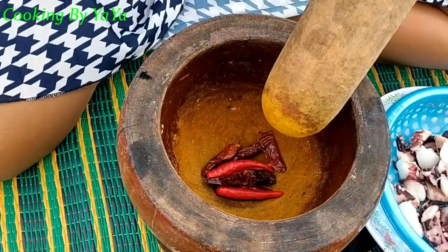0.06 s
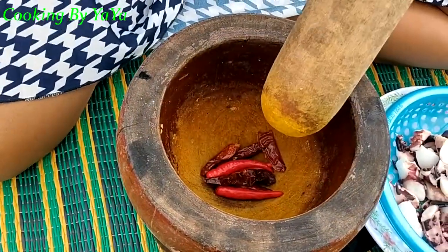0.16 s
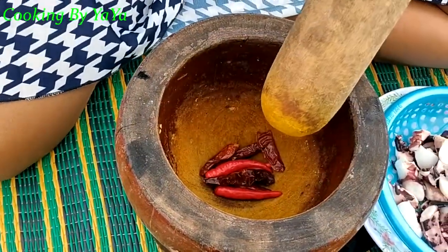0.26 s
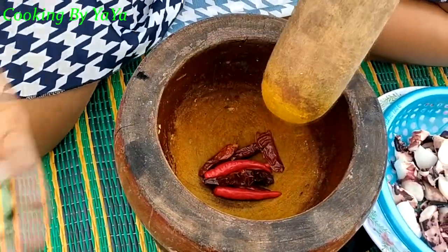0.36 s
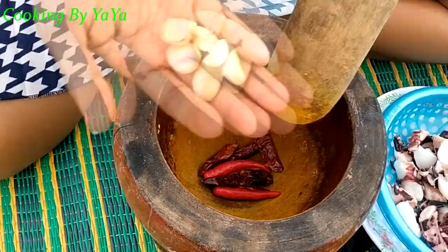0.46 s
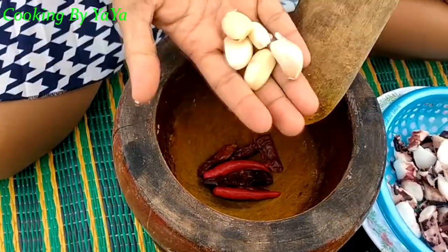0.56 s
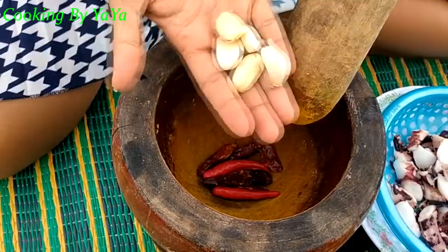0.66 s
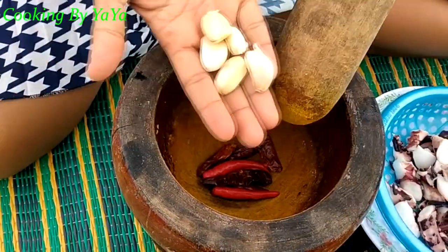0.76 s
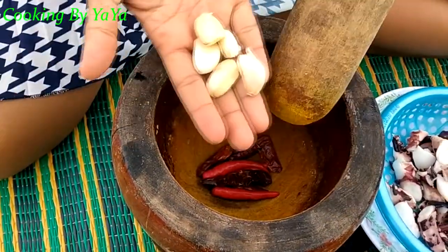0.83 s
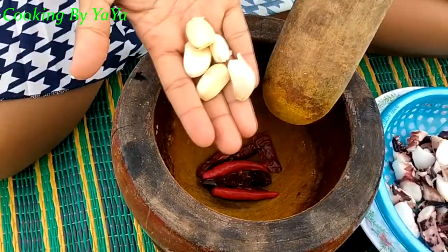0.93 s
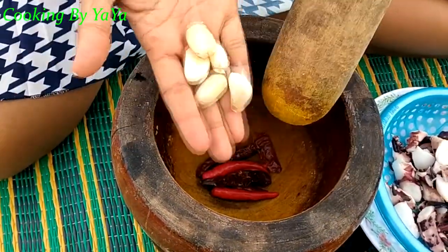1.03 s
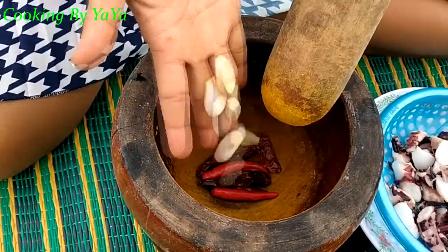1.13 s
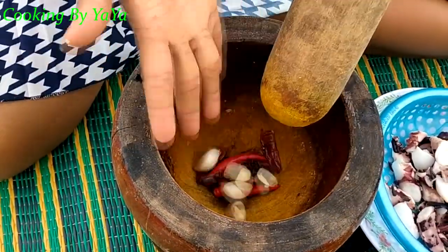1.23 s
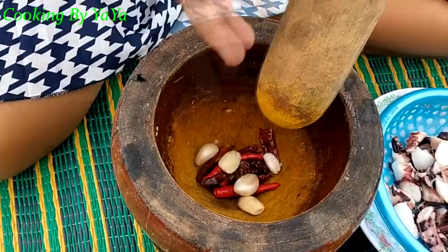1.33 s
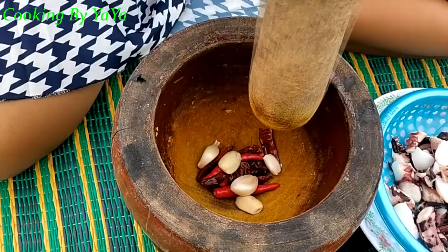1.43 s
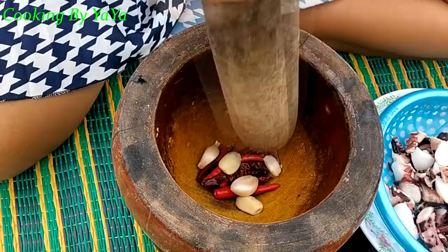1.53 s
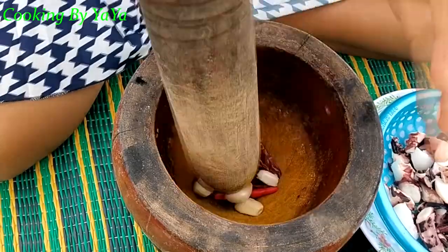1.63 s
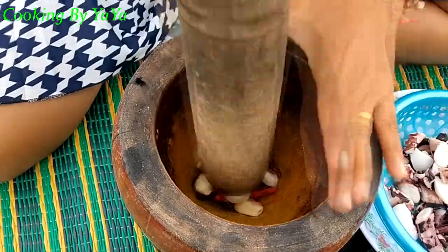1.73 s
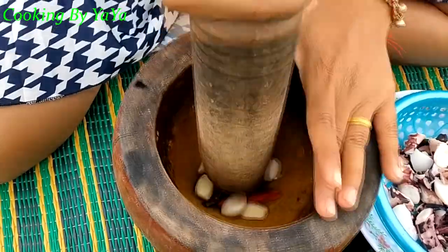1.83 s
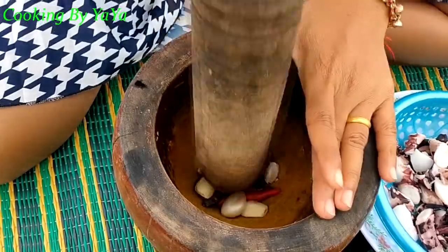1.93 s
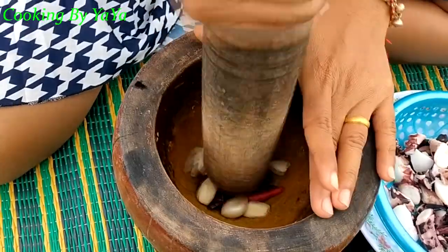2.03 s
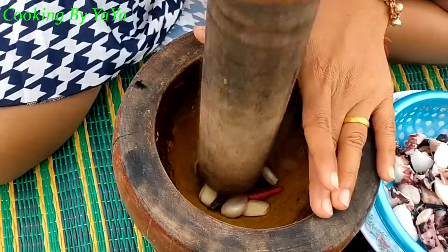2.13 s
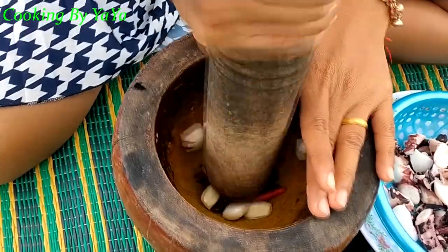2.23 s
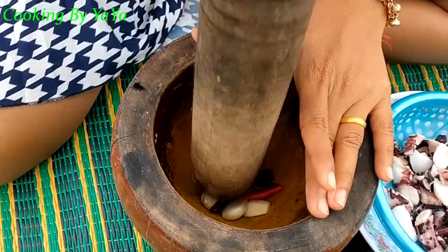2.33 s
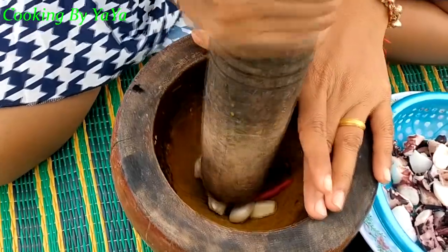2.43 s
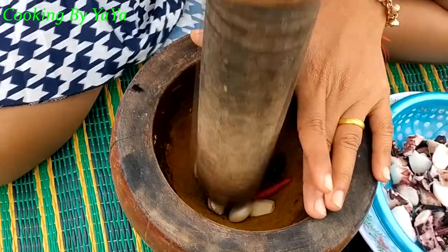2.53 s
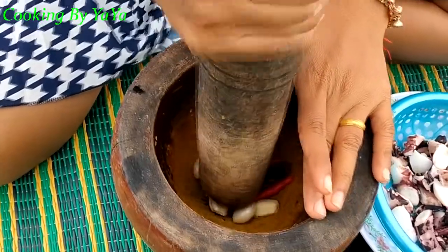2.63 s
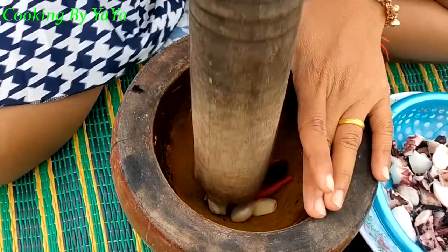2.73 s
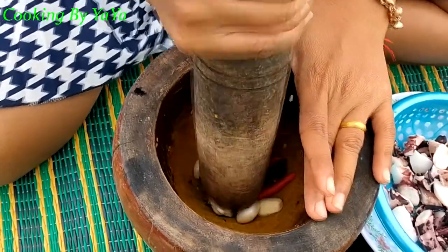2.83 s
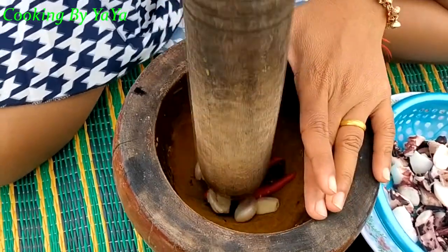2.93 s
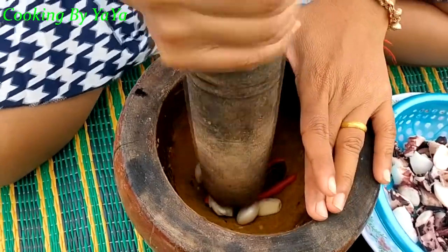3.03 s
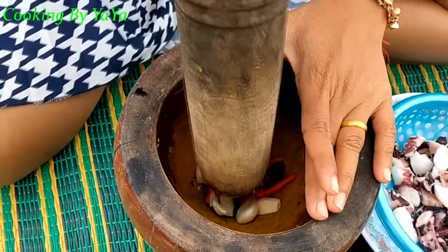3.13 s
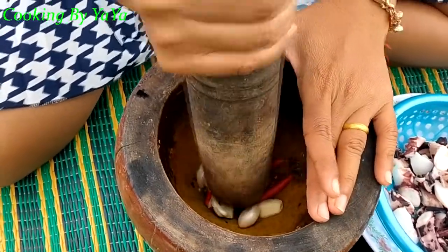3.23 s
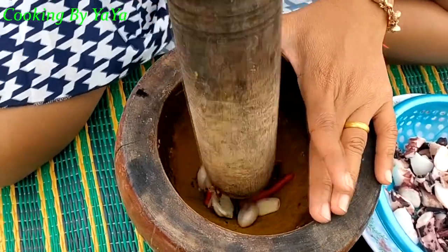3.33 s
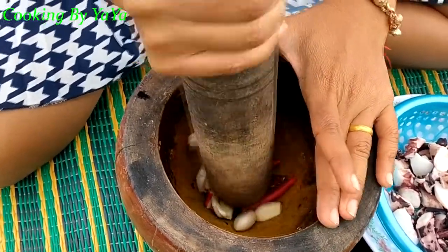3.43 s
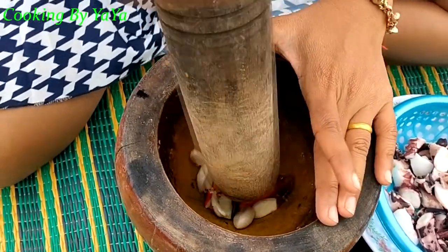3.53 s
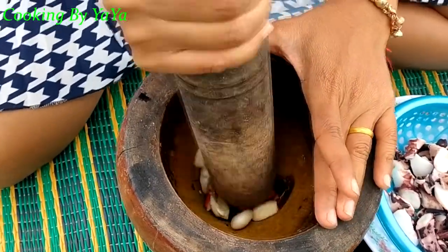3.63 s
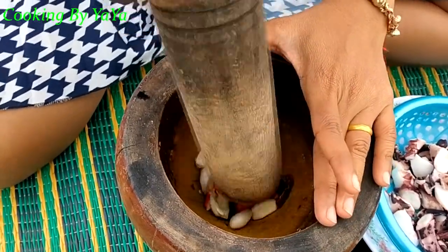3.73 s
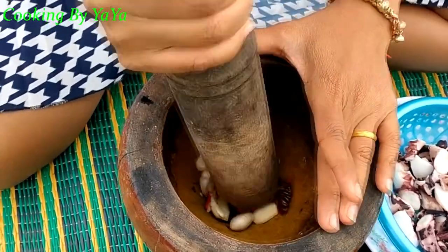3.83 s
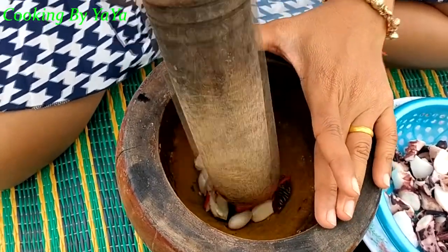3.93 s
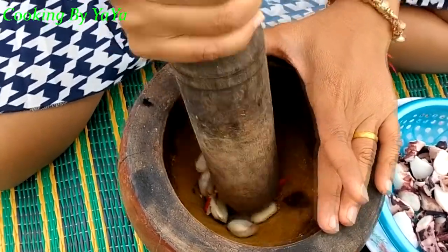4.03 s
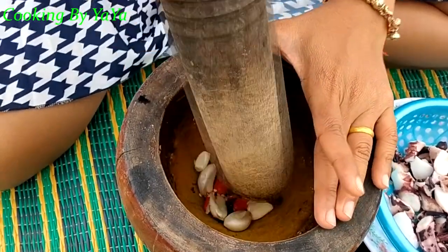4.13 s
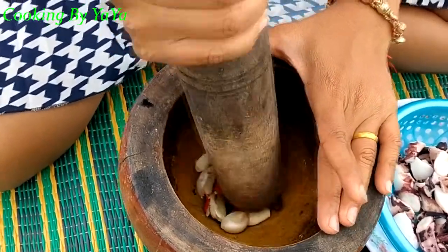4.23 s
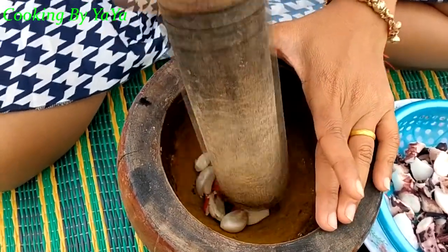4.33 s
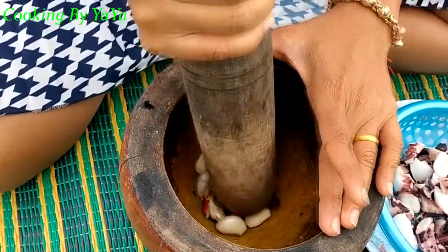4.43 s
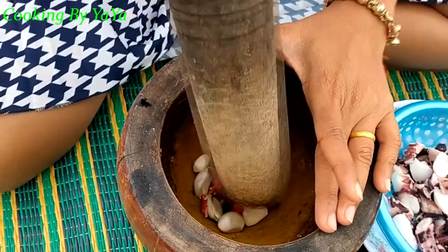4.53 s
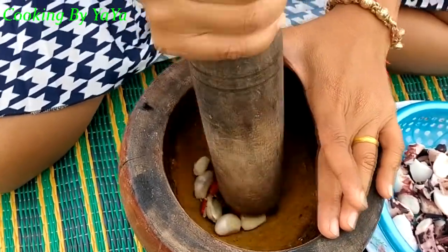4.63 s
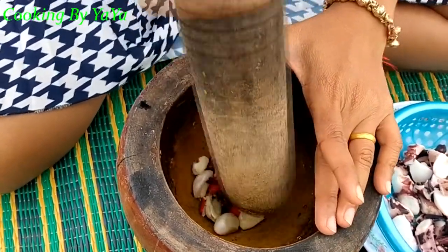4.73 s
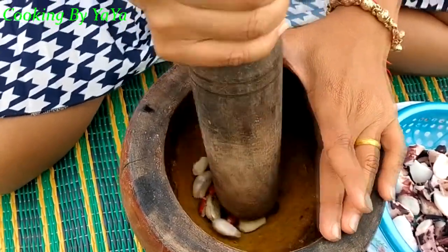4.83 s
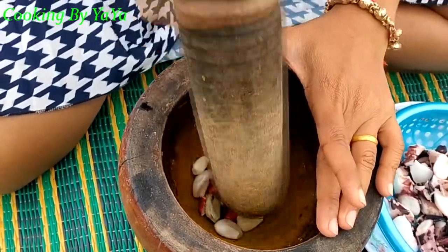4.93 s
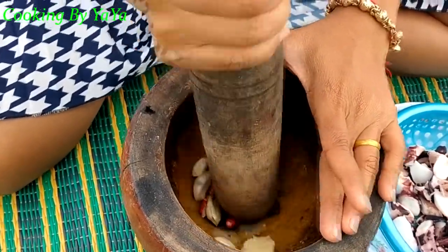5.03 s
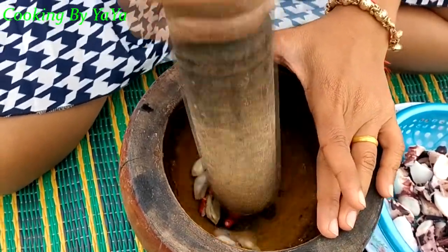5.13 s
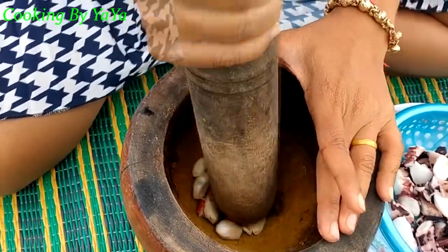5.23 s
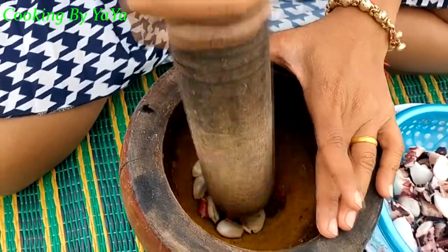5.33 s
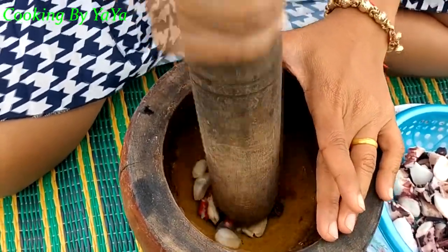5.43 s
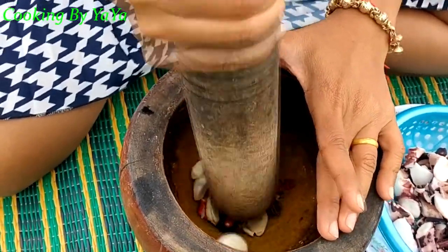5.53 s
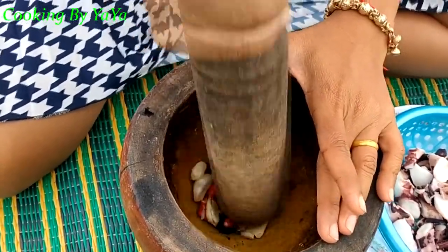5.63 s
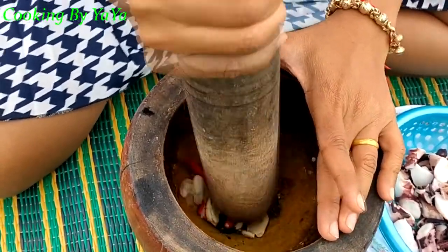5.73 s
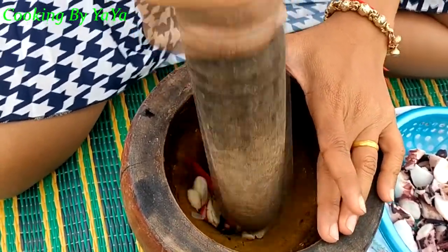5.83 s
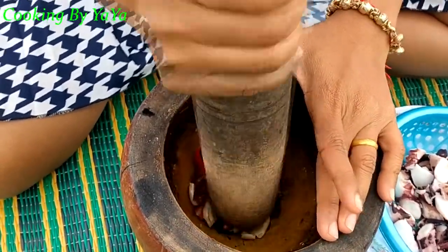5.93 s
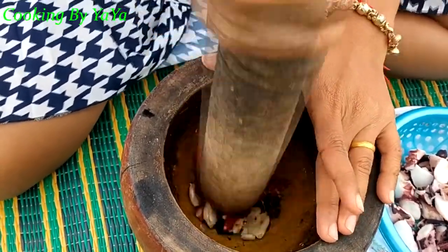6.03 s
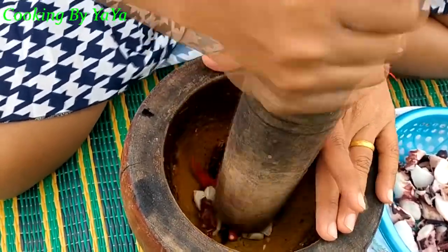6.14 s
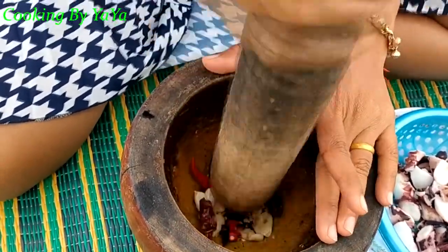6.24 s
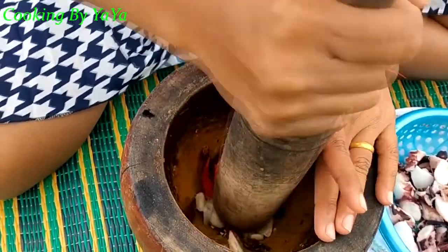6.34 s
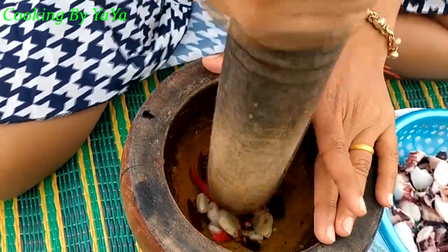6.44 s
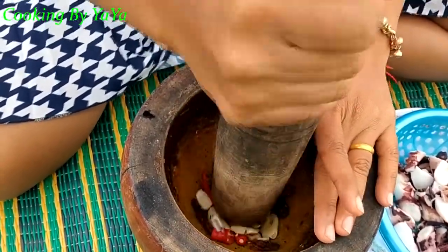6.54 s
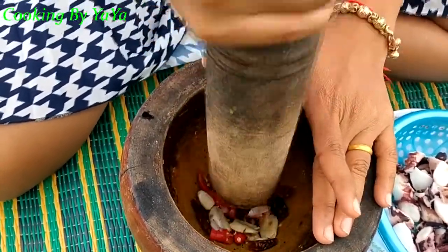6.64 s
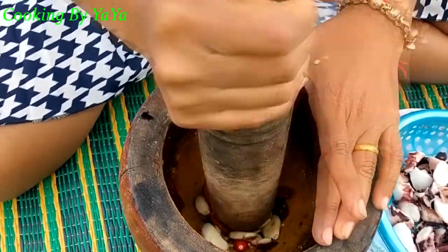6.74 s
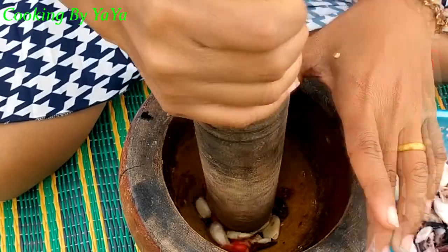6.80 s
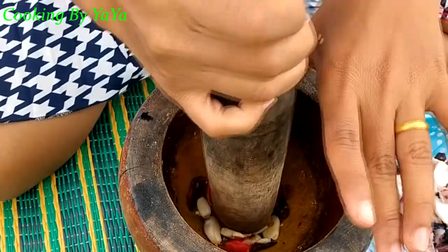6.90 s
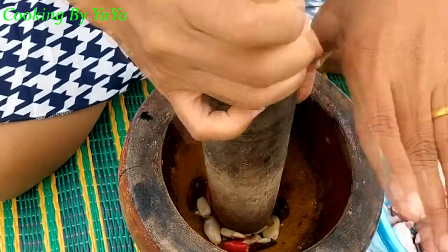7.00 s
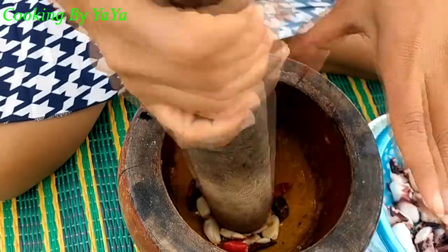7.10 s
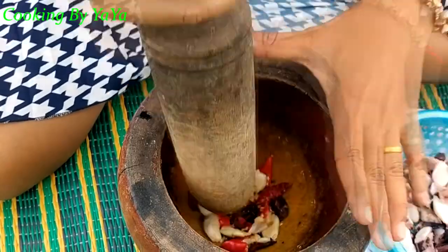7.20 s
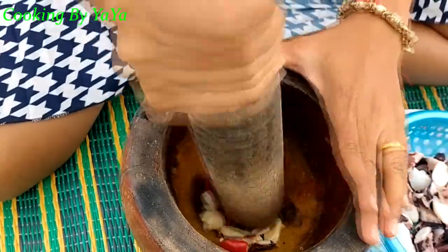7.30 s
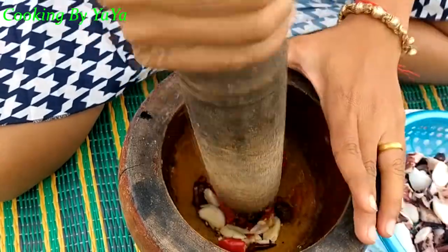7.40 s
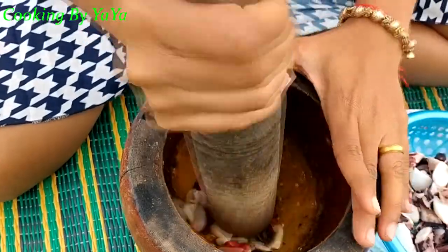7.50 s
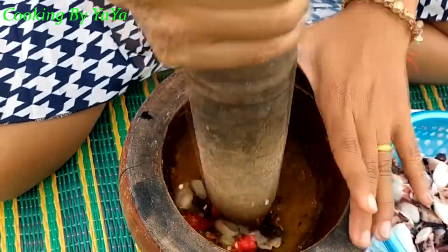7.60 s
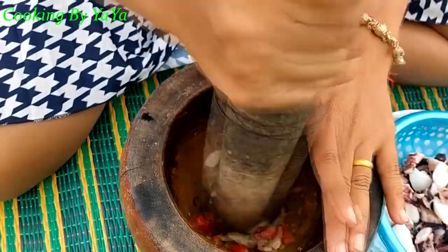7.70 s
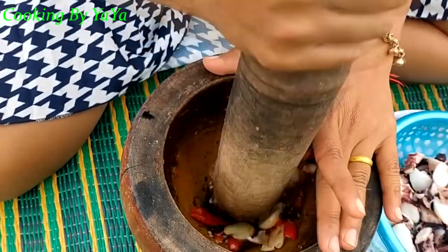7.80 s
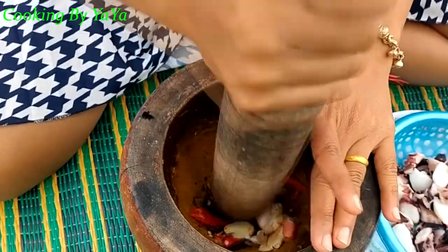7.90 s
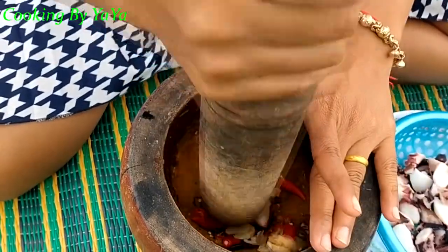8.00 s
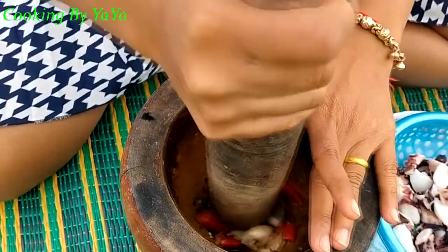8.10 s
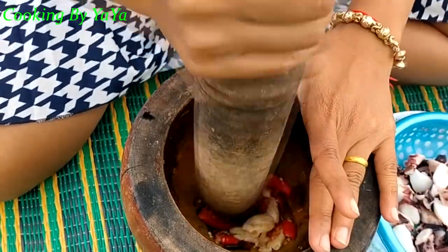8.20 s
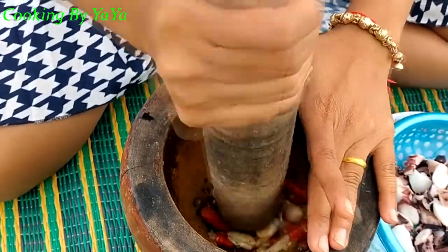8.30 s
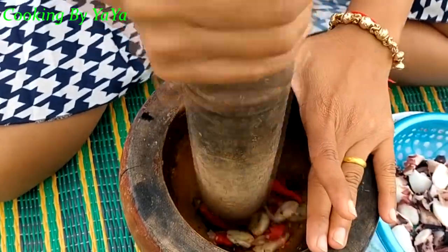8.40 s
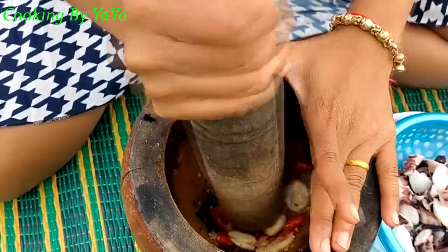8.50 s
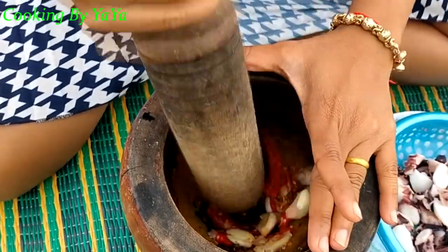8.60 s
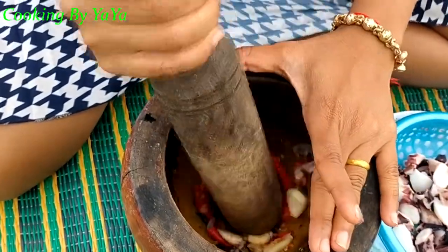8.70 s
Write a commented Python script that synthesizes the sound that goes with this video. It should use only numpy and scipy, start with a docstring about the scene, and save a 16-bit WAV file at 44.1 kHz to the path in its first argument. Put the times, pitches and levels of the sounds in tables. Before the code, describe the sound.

Close, dry and outdoors: faint hiss and light breeze, then garlic cloves patter softly into a wooden mortar. A double wooden knock starts steady pounding, about five strokes a second, each a short moist crunch, many with a hollow knock, grains rustling as the pestle lifts. After a brief pause the hand clacks on the rim and pounding resumes, wetter and crunchier, with stronger low gusts bumping the microphone.

```python
"""A wooden pestle pounds garlic and dried chilies in a wooden mortar, about five strokes a second with one pause.
Each stroke is a short crunch of noisy breaks; where the pestle gets through to the wood, damped modes knock hollowly.
Before that, cloves drop in. Crackling grains rustle as the pestle lifts, and skins snap through narrow resonances.
Once the steadying hand clacks twice on the rim, ringing modes of its own.
Outdoors and dry: one early reflection of the mortar, gusts of filtered noise at the microphone and a faint hiss."""
import sys
import numpy as np
from scipy import signal
from scipy.io import wavfile
from scipy.ndimage import uniform_filter1d

SR = 44100
rng = np.random.default_rng(int(sys.argv[2]) if len(sys.argv) > 2 else 0)


def master(y):
    """Save y as 16-bit WAV."""
    cut = np.clip(np.atleast_2d(y).T, -1, 1)
    pcm = np.round(cut * 32767)  # scale
    wavfile.write(sys.argv[1], SR, pcm.astype(np.int16))


N = 386316

# strokes into garlic and chilies, each followed by the lift out of them:
# peak t/s, level/dB before the layer trims, fall to 1/e/s, treble shelf/dB before its weighting,
# lift rustle level/dB, lift length/s
STROKES = [(1.797, -28.5, 0.006, -1, -55.5, 0.061), (1.987, -32.5, 0.0083, -6, -59, 0.16),
           (2.182, -31, 0.011, -3.5, -52, 0.058), (2.386, -31, .012, -3.5, -58, 0.11),
           (2.589, -29.5, 0.014, -1.5, -56, 0.083), (2.796, -30.5, 0.0095, -4.5, -60, 0.084),
           (2.999, -29.5, 0.0068, -2.5, -60.5, 0.12), (3.206, -29, 0.0044, -5, -54, 0.11),
           (3.410, -28, 0.011, -6.5, -57.5, 0.16), (3.623, -32.5, 0.0027, -1.5, -58, 0.044),
           (3.825, -36.5, 0.0056, 1, -59.5, 0.099), (4.028, -33.5, 0.0058, -0.5, -57, 0.076),
           (4.225, -31.5, 0.012, 3.5, -58.5, 0.088), (4.436, -33.5, 0.0024, -8, -54.5, 0.065),
           (4.64, -32.5, 0.0051, -2.5, -58.5, 0.065), (4.845, -33, 0.0063, -0.5, -61, 0.055),
           (5.057, -36.5, 0.0034, -4.5, -68, 0.16), (5.272, -37, 0.0072, 2, -63, 0.058),
           (5.479, -40, 0.002, -1, -74, 0.22), (5.68, -28.5, 0.011, 1.5, -55, 0.073),
           (5.884, -35, 0.011, 7.5, -69, 0.092), (6.087, -29.5, .012, 0, -61, 0.036),
           (6.292, -34, 0.008, -2, -61.5, 0.14), (6.507, -31.5, 0.008, -2, -62.5, 0.087),
           (6.713, -28, 0.01, -14.5, -64, 0.21), (7.32, -30, 0.0078, -3, -53.5, 0.17),
           (7.511, -27, 0.022, -3, -54, 0.26), (7.726, -27, .009, -1, -54.5, 0.17),
           (7.929, -33.5, 0.013, -1, -59.5, 0.15), (8.127, -36, 0.015, 6.5, -65.5, 0.12),
           (8.313, -30, 0.018, -4, -60, 0.15), (8.517, -41.5, .016, 0, -61, 0.11),
           (8.715, -33, 0.0083, 1.5, -59, .06)]
# spectrum of loose pieces and skins, the bowl lifting the band around 3 kHz: f/Hz, relative level/dB
RUSTLE_SPECTRUM = [(200, -25), (700, -11), (1050, -21), (1600, -12), (2300, -5), (3200, 2.5), (3800, -6.5),
                   (4700, -14), (6200, -13), (8000, -10), (11800, -20.5), (14000, -14)]


def gain_of(db):
    """Decibels to amplitude."""
    return 10 ** (np.asarray(db) / 20)


def evened(x):
    """Scales to rms 1."""
    return x / np.sqrt(np.mean(x ** 2) + 1e-20)


def burst(x, db):
    """Scales a short sound so that its energy, spread over 10 ms, has the level db."""
    spread_rms = np.sqrt(np.sum(x ** 2) / (.01 * SR) + 1e-20)
    return gain_of(db) * x / spread_rms


def read(points, hz):
    """Reads a spectrum on a log-frequency axis."""
    f, value = np.transpose(points)
    return np.interp(np.log(hz + 1), np.log(f + 1), value)


def follow(curve, t):
    """Reads a curve at the times t."""
    return np.interp(t, *np.transpose(curve))


def add(mix, s, sound):
    """Mixes a sound in at time s."""
    part = mix[round(s * SR):][:len(sound)]
    part += sound[:len(part)]


def coloured(x, points, treble_db=0, size=1024):
    """Minimum-phase filter with the given spectrum, tilted by a treble shelf."""
    hz = abs(np.fft.fftfreq(size, 1 / SR))
    # share of treble_db that applies, below 3.5 kHz and above 6 kHz
    shelf = read([(3500, 0.14), (6000, 0.87)], hz)
    log_gain = np.log(gain_of(read(points, hz) + treble_db * shelf))
    taps = np.fft.ifft(np.exp(np.conj(signal.hilbert(log_gain)))).real
    return signal.fftconvolve(x, taps)[:len(x)]


def fractures(count, per_s, spread_db):
    """A random train of tiny breaks, most small and a few large."""
    chance, size, sign = rng.random((3, count))
    size_db = spread_db * np.minimum(-np.log(1 - size), 4)
    return (chance < per_s / SR) * gain_of(size_db) * np.sign(sign - .5)


def crackle(length, per_s, spread_db, wet_db, count=24):
    """Dry broadband breaks mixed with tiny wet pops, each a few cycles long at its own pitch."""
    pops = np.zeros(length)
    for hz in np.geomspace(700, 15000, count):
        resonator = signal.iirpeak(hz, 7, fs=SR)
        pops += signal.lfilter(*resonator, fractures(length, per_s / 5, spread_db))
    return evened(fractures(length, per_s, spread_db)) + gain_of(wet_db) * evened(pops)


def swells(rows, t, rise_s, sag_db_per_s, fall_s):
    """Joint amplitude of overlapping swells: each rises, sags as it ages and dies away after its length."""
    power = np.zeros(len(t))
    for s, db, length in rows:
        age = np.maximum(t - s, 0)
        held = np.minimum(age / rise_s, 1) * gain_of(db - sag_db_per_s * age)
        power += (held * np.exp(-np.maximum(age - length, 0) / fall_s)) ** 2
    return np.sqrt(power)


def air():
    """Faint outdoor hiss: steady coloured noise under a slow level curve."""
    # hiss spectrum: f/Hz, relative level/dB
    hiss_spectrum = [(30, 8), (200, 5), (400, 0.5), (1100, 0.5), (2300, 3.5), (3400, 1), (4500, -3),
                     (6500, -11), (8200, -4.5), (9500, -15.5), (12500, -9.5), (15000, -11)]
    # hiss level: t/s, level/dB
    hiss_level = [(0, -69.5), (.6, -72.5), (1, -73), (2, -70.5), (8.7, -70)]
    hiss = evened(coloured(rng.standard_normal(N), hiss_spectrum))
    return hiss * gain_of(follow(hiss_level, np.arange(N) / SR))


def breeze(size=2048):
    """Eddies at the microphone: a lumpy rumble that reaches higher in stronger gusts."""
    # gusts: t/s, level/dB, length/s
    gust_rows = [(.14, -51, 0.15), (1.3, -45, 0.14), (1.44, -44.5, 0.15), (1.66, -44, 0.19),
                 (2.05, -44, 0.39), (2.45, -39.5, 0.13), (2.62, -44.5, 0.13), (4.18, -44, 0.27),
                 (4.54, -40.5, .24), (5.12, -45, 0.14), (5.26, -42, .36), (6.53, -40, 0.23),
                 (7.02, -30.5, 0.17), (7.24, -36, 0.21), (7.99, -36.5, 0.13), (8.24, -38, .13),
                 (8.43, -36, 0.11), (8.58, -33.5, 0.21)]
    # light breeze between the gusts: t/s, level/dB
    calm_level = [(0, -50), (.7, -56), (1.2, -51), (3.05, -57), (3.6, -49.5), (4.1, -58), (6.1, -56.5),
                  (6.45, -48.5), (7.8, -50.5)]
    # wind spectrum at a breeze level of -44.5 dB: f/Hz, relative level/dB
    wind_spectrum = [(15, 0), (30, -3), (60, -1), (110, -5.5), (175, -15.5), (260, -29.5), (400, -42),
                     (800, -51), (2000, -63)]
    hz, t, z = signal.stft(rng.standard_normal(N), SR, nperseg=size, noverlap=size * 3 // 4)
    # the negative sag makes a gust grow by 3 dB/s
    gusts = swells(gust_rows, t, rise_s=0.063, sag_db_per_s=-3, fall_s=0.13)
    level_db = 20 * np.log10(np.hypot(gusts, gain_of(follow(calm_level, t))))
    # relative wind speed stretches the spectrum along the frequency axis
    speed = gain_of(0.37 * (level_db + 44.5))
    shape = gain_of(read(wind_spectrum, hz[:, None] / speed))
    z = z * shape / np.linalg.norm(shape, axis=0)
    rumble = evened(signal.istft(z, SR, nperseg=size, noverlap=size * 3 // 4)[1][:N])
    smooth_noise = uniform_filter1d(rng.standard_normal(N), size=1600)
    eddies = evened(uniform_filter1d(smooth_noise, size=900))
    rumble = evened(rumble * gain_of(2.4 * eddies))
    return rumble * gain_of(np.interp(np.arange(N) / SR, t, level_db))


def rustle():
    """Clumps of moist crackle as the pieces slide back and stick to the pestle, with a finer fizz from dry skins."""
    # loose pieces tumbling or pushed aside between strokes: t/s, level/dB, length/s
    stirs = [(1.17, -54.5, 0.17), (1.49, -60, 0.097), (1.565, -49.5, 0.051), (1.66, -66.5, 0.18),
             (5.8, -47, 0.022), (7.14, -53.5, 0.043), (7.36, -72, 0.066), (7.455, -44.5, 0.023),
             (8.59, -51.5, 0.05)]
    # dry fizz against the moist crackle: t/s, relative level/dB
    fizz_level = [(1.6, 0), (2.2, -1.5), (3.5, 0), (4.5, -5), (5.2, 3), (6.9, 1.5), (7.6, -2.5), (8.6, 2.5)]
    sag_db_per_s, settle_s = 16.5, 0.03
    t = np.arange(N) / SR
    slow = t[::64]  # a coarse clock is enough for the swells
    lifts = [(s, db, length) for s, _, _, _, db, length in STROKES]
    lifting = swells(lifts, slow, 0.0083, sag_db_per_s, settle_s)
    stirring = swells(stirs, slow, 0.042, sag_db_per_s, settle_s)  # a slower rise than the lifts
    motion = np.interp(t, slow, np.hypot(lifting, stirring))
    clumps = evened(uniform_filter1d(rng.standard_normal(N), size=400))

    moist = evened(crackle(N, per_s=2600, spread_db=5.2, wet_db=8))
    skins = evened(crackle(N, per_s=7000, spread_db=3.6, wet_db=2))
    moist = signal.sosfilt(signal.butter(4, 4500, fs=SR, output="sos"), moist)
    skins = signal.sosfilt(signal.butter(4, 4500, "high", fs=SR, output="sos"), skins)
    # single seeds and skin flakes tick out of the rustle
    ticks = gain_of(-8.5) * evened(fractures(N, per_s=62, spread_db=2.5))
    fizz = skins * gain_of(follow(fizz_level, t))
    grains = (moist + ticks + fizz) * gain_of(2 * clumps)
    return evened(coloured(grains, RUSTLE_SPECTRUM)) * motion


def clacks():
    """The steadying hand comes back: a rough, hard contact rings the rim briefly."""
    # contacts of the double clack: t/s, level/dB of the ring
    contacts = [(7.241, -40.5), (7.247, -41)]
    # modes of the clack: f/Hz, relative start level/dB, t60/s
    rim_modes = [(610, -5, 0.057), (1324, -16, 0.032), (2210, 2, 0.039), (2940, -7, 0.036),
                 (5373, -21, 0.035), (5940, -9, 0.015)]
    out, t = np.zeros(N), np.arange(SR // 20) / SR
    ring = sum(gain_of(db - 60 * t / t60) * np.sin(2 * np.pi * hz * t) for hz, db, t60 in rim_modes)
    for s, db in contacts:
        scrape = rng.standard_normal(len(t)) * np.exp(-t / .003)
        tick = coloured(scrape, RUSTLE_SPECTRUM, treble_db=-12)
        add(out, s, burst(ring, db) + burst(tick, db - 10))
    return out


def snaps():
    """Small clusters of breaks with a sudden start, each ringing a pocket of air in the mash."""
    # cloves landing, skins snapping, wet pieces squelching:
    # t/s, level/dB before the layer trims, fall to 1/e/s, resonance f/Hz
    snap_rows = [(0.128, -64.5, .008, 2560), (.366, -72, .001, 7040), (1.182, -45.5, 0.0061, 2390),
                 (1.189, -46, 0.0011, 3700), (1.236, -47.5, 0.0098, 2860), (1.247, -43.5, 0.015, 2230),
                 (2.075, -46.5, 0.016, 2600), (2.315, -41.5, 0.052, 2950), (2.694, -50, 0.011, 3000),
                 (3.277, -47.5, 0.0051, 2970), (4.633, -43.5, 0.0032, 7200), (5.707, -43.5, 0.017, 2550),
                 (5.848, -46.5, 0.0067, 1710), (6.384, -54.5, 0.003, 3200), (6.864, -49.5, 0.006, 3530),
                 (7.451, -51, 0.002, 1620), (7.478, -48, .002, 2530), (7.485, -43.5, 0.0017, 2850),
                 (7.691, -40.5, 0.0054, 2880), (8.289, -51.5, 0.013, 3400)]
    out, t = np.zeros(N), np.arange(SR // 10) / SR
    for s, db, fall, hz in snap_rows:
        breaks = crackle(len(t), per_s=6500, spread_db=2.5, wet_db=-10) * np.exp(-t / fall)
        pocket = signal.lfilter(*signal.iirpeak(hz, 14, fs=SR), breaks)
        snap = coloured(breaks, RUSTLE_SPECTRUM, treble_db=1.5)
        add(out, s, burst(snap, db - 3) + burst(pocket, db - 7.0))
    return out


def wood_modes(pitch=1, count=5000):
    """The choked ring of each mode, one a row; contact retunes all but the highest."""
    # modes of mortar and pestle: f/Hz before retuning, relative level/dB, t60/s before the choke
    modes = [(268.5, 1.5, 0.017), (459, -7.5, 0.032), (580.7, 4.5, 0.027), (693, 0.5, 0.036),
             (804, -2, 0.02), (995, -1.5, 0.006), (1420, 8.5, 0.037)]
    hz, db, t60 = np.transpose(modes)
    hz = np.append(hz[:-1] * pitch, hz[-1])
    sense = [1, 1, 1, -1, 1, -1, 1]  # two of the modes swing the opposite way
    t = np.arange(count) / SR
    held = np.exp(-(t / 0.045) ** 2)  # the pestle stays pressed down and chokes the ring
    rows = []
    for f, level, ring_s, sign in zip(hz, db, t60, sense):
        ring = np.sin(2 * np.pi * f * t) * gain_of(-60 * t / ring_s) * held
        rows.append(sign * burst(ring, level))
    return np.array(rows)


def knocks():
    """A brief push on the wood with a dry crack; the landing place decides which modes ring."""
    # pestle reaching the wood; mash under it gives a thud, a bare contact is hard and rings high:
    # t/s, level/dB before mode weights, thud/dB, wall mode/dB, hardness/dB, pitch factor
    # (the three weights are relative to the third mode)
    contacts = [(1.5694, -33, -37, 6, -21, 1.084), (1.574, -32, -40, 1.5, -16.5, 1.15),
                (2.7939, -53.5, 1, 4, -2.5, 0.98), (2.9984, -42, -11, -3.5, -6, 1.005),
                (3.208, -43.5, 3, 4, -40, 0.88), (3.414, -42.5, 6, 6, -13, 0.896),
                (3.623, -38, -7, -7.5, -18, 1.034), (3.8215, -42, -30, -2, -22, 1.06),
                (3.8265, -47.5, 10.5, 15, -30, 0.92), (4.027, -57.5, 16, 11.5, 4, 1.11),
                (4.2278, -43.5, 4, 5, -21, .995), (4.4346, -31, -10, -5.5, -13.5, 0.99),
                (4.639, -37, 0.5, 3.5, -14, 0.92), (4.8453, -42, 0.5, -4, -8.5, 1.09),
                (5.0519, -37.5, -13.5, 6.5, -7, 1.06), (5.0557, -30, -35, -21, -11, 1.1),
                (5.2721, -49.5, -1, -7, -36, 0.983), (5.4769, -31.5, -20, -35, -13, 1.05),
                (5.683, -48.5, 3.5, -4.5, -31, 1.13), (5.8855, -36, -12, -11, -21, 1.11),
                (6.0941, -40.5, -23, 4.5, -20, 0.96), (6.1, -31, -40, -7.5, -23, 1.005),
                (6.5085, -36.5, -2.5, 12, -28, 0.91), (6.7182, -30.5, -22, -0.5, -15, 0.99),
                (7.323, -39, -28, -22, -13.5, 1.16), (7.5148, -42.5, 0, 2, -4.5, 1.035),
                (7.7326, -46.5, 0, 2.5, -34, 0.96), (8.1311, -42.5, -2, 2, -22, 0.95),
                (8.5158, -30, -38, -19, -9, 1.08), (8.717, -29.5, -34, -9, -39, 1.074)]
    # woody crack spectrum: f/Hz, relative level/dB
    crack_spectrum = [(200, -22), (500, 8.5), (1000, -7), (2000, -3.5), (2900, -7.5), (4000, -32.5),
                      (9000, -33)]
    out, t = np.zeros(N), np.arange(-SR // 100, SR // 50) / SR
    push = np.exp(-(t / .00008) ** 2)
    for s, db, thud_db, wall_db, hard_db, pitch in contacts:
        rim_db = hard_db - 1  # the rim modes follow the hardness, just under the high ring
        weights = gain_of([thud_db, thud_db, 0, wall_db, rim_db, rim_db, hard_db])
        # the mash yields in small slips around the moment of contact
        slips = rng.standard_normal(len(t)) * np.exp(-abs(t) / 0.00209)
        force = push / push.sum() + 0.058 * slips / np.linalg.norm(slips)
        ring = signal.fftconvolve(force, weights @ wood_modes(pitch))
        add(out, s + t[0], gain_of(db) * ring)
        # many heavily damped modes blur into a short woody crack
        fading_noise = rng.standard_normal(len(t)) * np.exp(-(t - t[0]) / 0.009)
        crack = coloured(fading_noise, crack_spectrum)
        add(out, s, burst(crack, db - 20) * np.linalg.norm(weights))
    return out


def crushes():
    """Breaks thicken as the pestle sinks in and thin out as it stops; they also shake the wood."""
    # crunch spectrum, the hollow of the bowl lifting the band around 3 kHz: f/Hz, relative level/dB
    crunch_spectrum = [(150, -36.5), (1050, -38.5), (1600, -16.5), (1950, -17.5), (2200, -2), (2600, -3),
                       (3100, 3), (4200, -10), (5500, -14.5), (7800, -9.5), (9200, -16), (10800, -14),
                       (12000, -24), (13700, -12.5)]
    rise_s = 0.004  # the pestle sinks in alike on every stroke
    out, t = np.zeros(N), np.arange(-SR // 20, SR // 10) / SR
    wood = wood_modes().sum(0)
    for s, db, fall, treble_db, _, _ in STROKES:
        pressure = np.exp(-np.where(t < 0, -t / rise_s, t / fall) ** 1.47)
        pressure = pressure + 0.39 * np.exp(-abs(t) / 0.00073)  # a clove gives way at the peak
        breaks = crackle(len(t), per_s=11000, spread_db=2.5, wet_db=5) * pressure
        shaken = signal.fftconvolve(breaks, wood)[:len(t)]
        crunch = coloured(breaks, crunch_spectrum, treble_db)
        add(out, s + t[0], burst(crunch, db - 0.5) + burst(shaken, db - 16.0))
    return out


def reflected(x, echo_db):
    """One near surface returns a single weaker copy 7.03 ms later."""
    return x + gain_of(echo_db) * np.pad(x, (round(.00703 * SR), 0))[:N]


def scene():
    """The mortar with its reflection, in the open air."""
    mortar = crushes() + knocks() + snaps() + rustle() + clacks()
    return (reflected(mortar, echo_db=-11.0) + breeze() + air())[None]


def record(dry):
    """Limits the band with a linear-phase low-pass at 16 kHz."""
    taps = signal.firwin(401, 16000, window=("kaiser", 8), fs=SR)
    return signal.oaconvolve(dry, taps[None], "same")


dry = scene()
out = record(dry)
master(out)
```